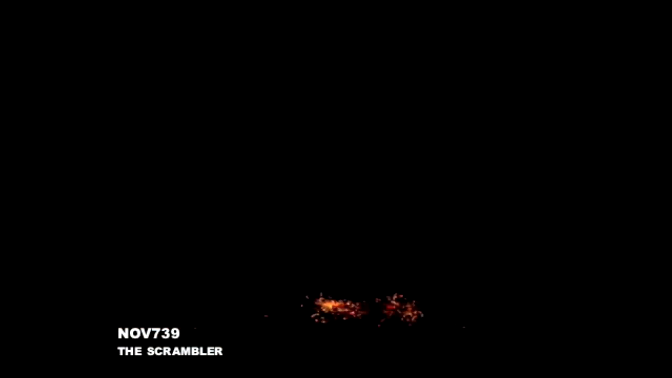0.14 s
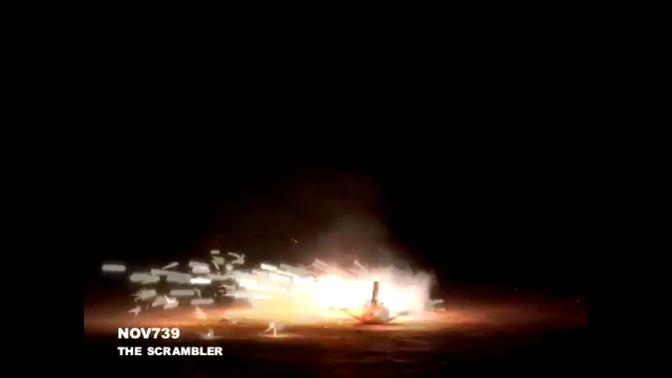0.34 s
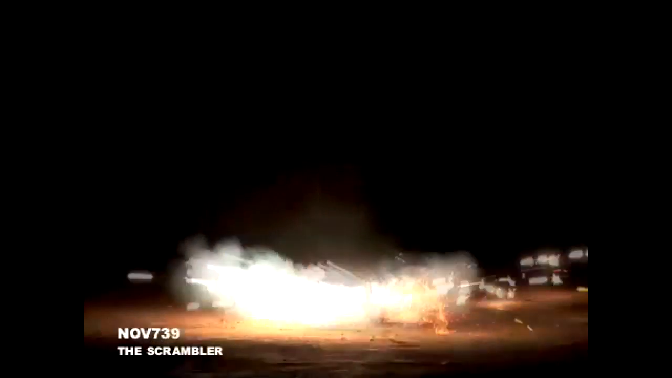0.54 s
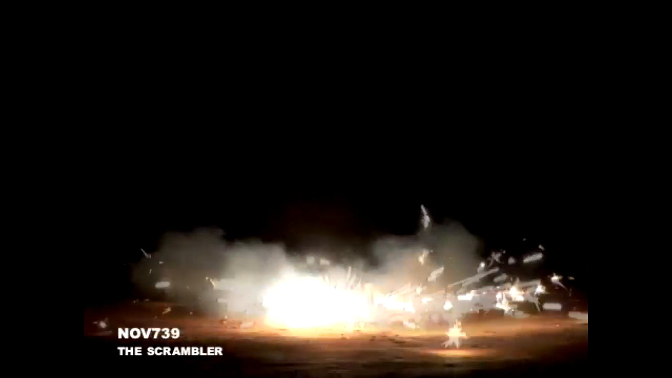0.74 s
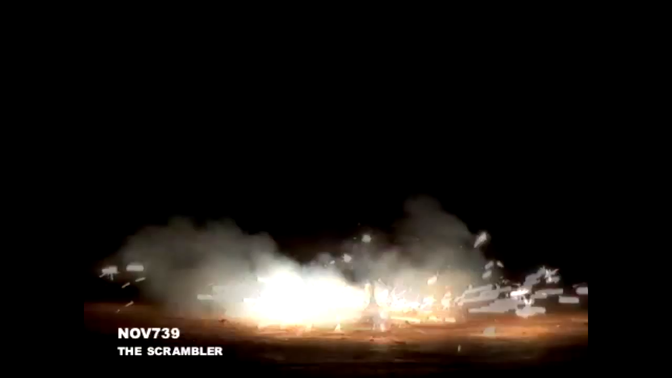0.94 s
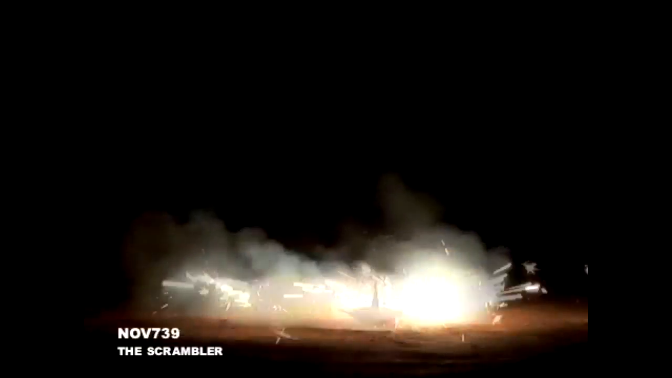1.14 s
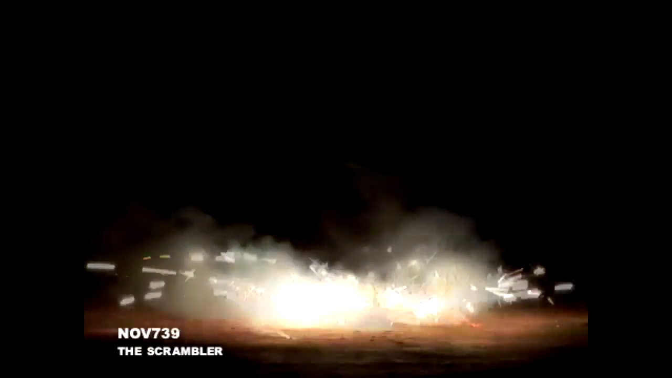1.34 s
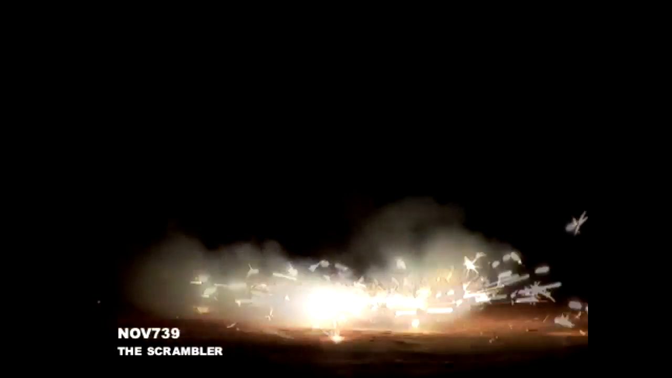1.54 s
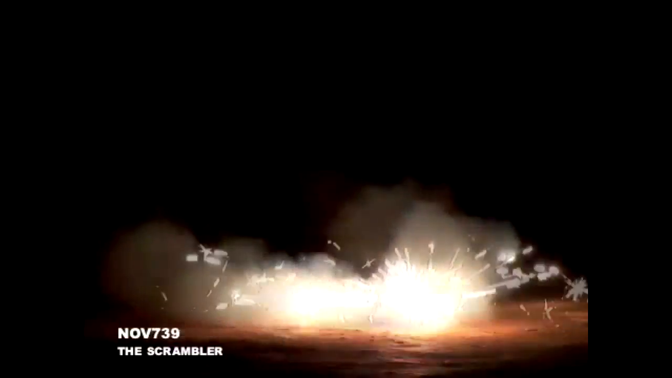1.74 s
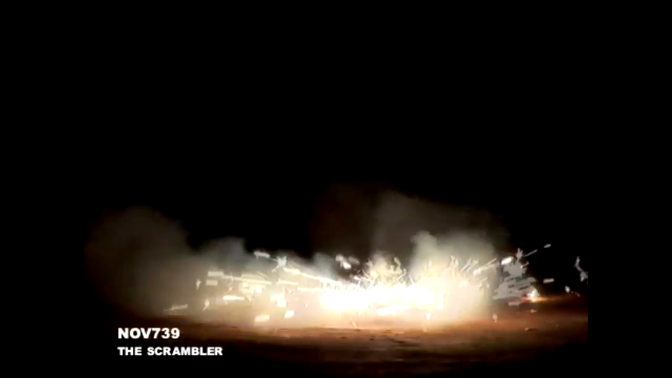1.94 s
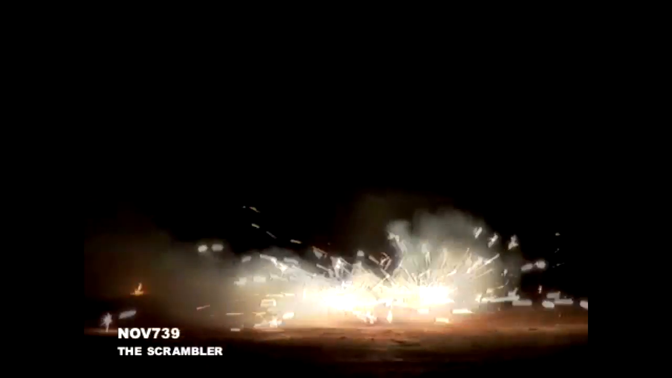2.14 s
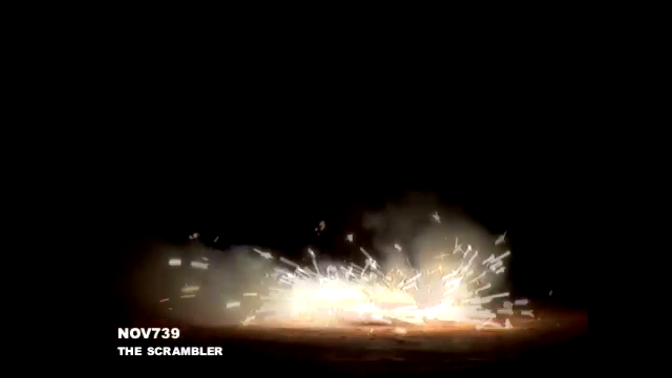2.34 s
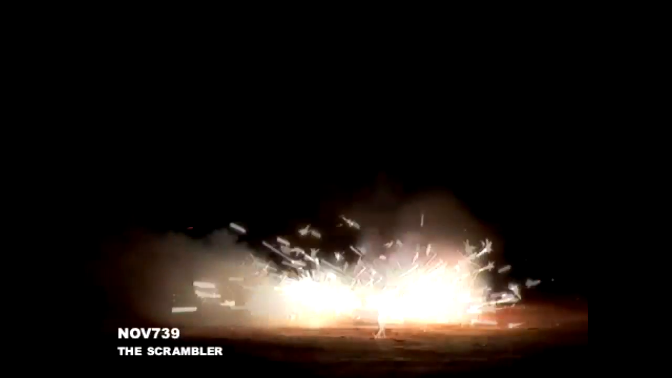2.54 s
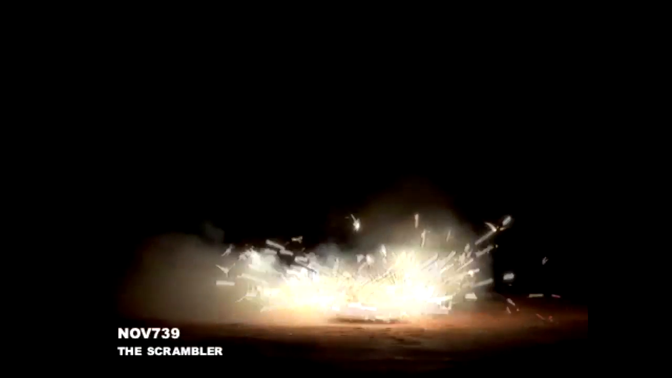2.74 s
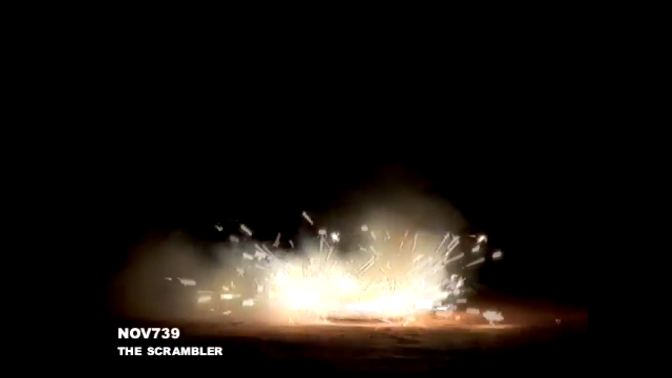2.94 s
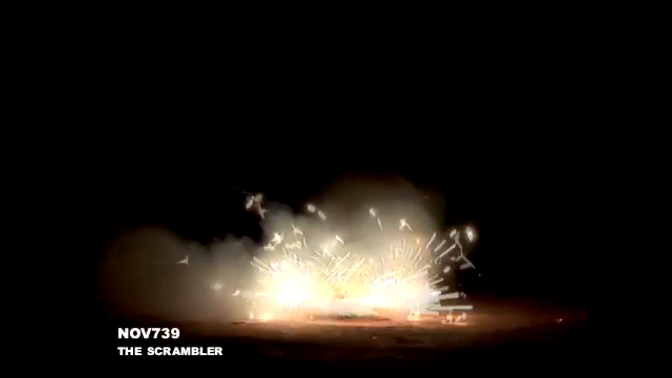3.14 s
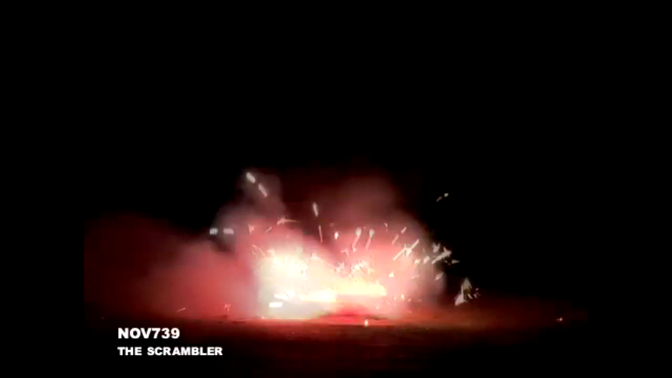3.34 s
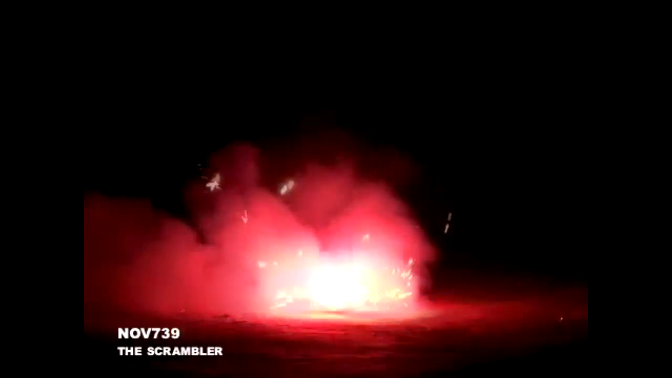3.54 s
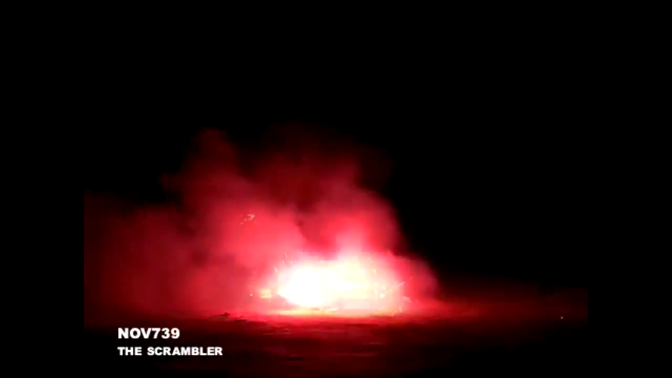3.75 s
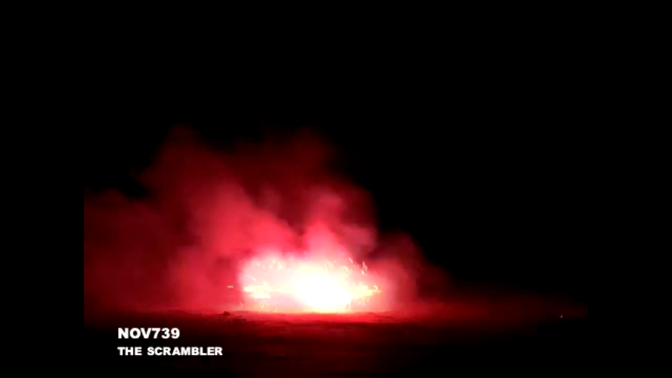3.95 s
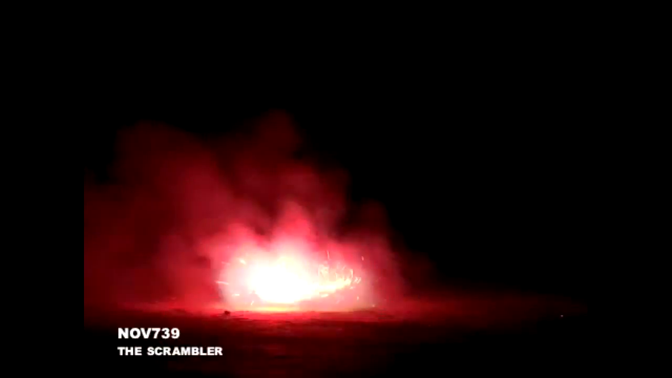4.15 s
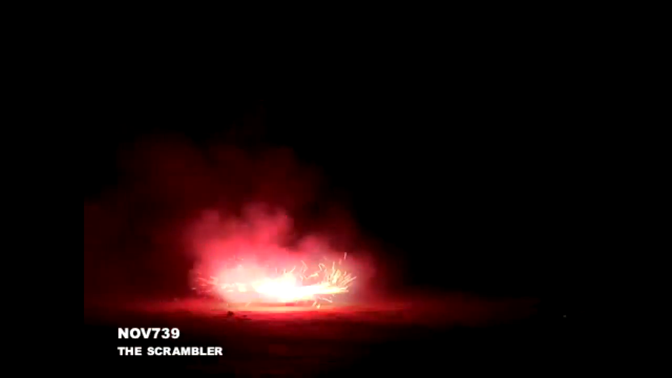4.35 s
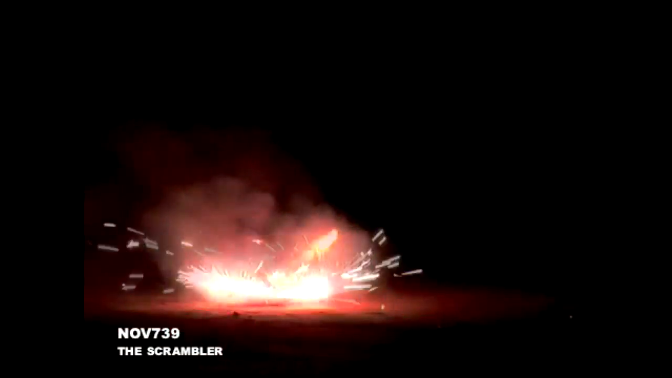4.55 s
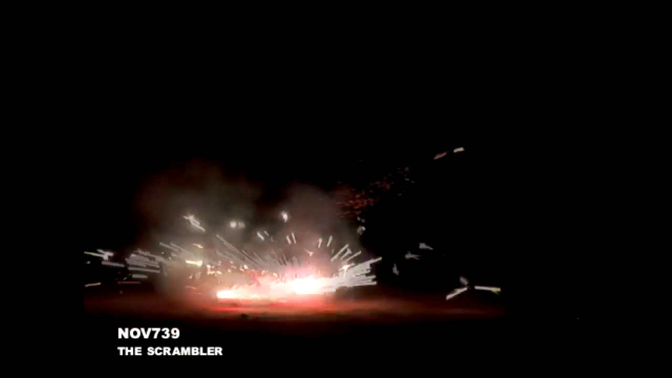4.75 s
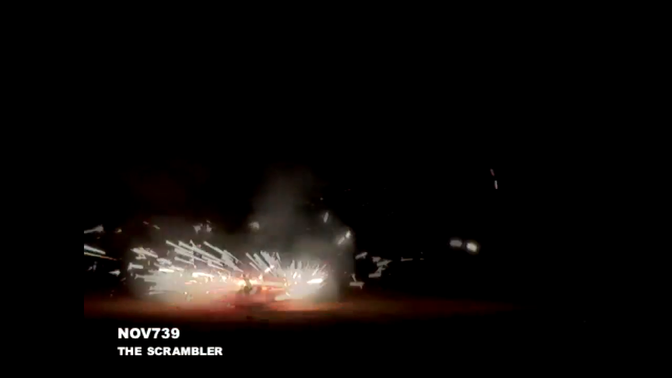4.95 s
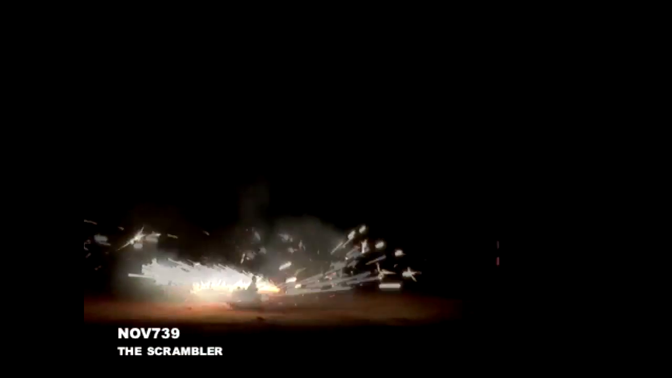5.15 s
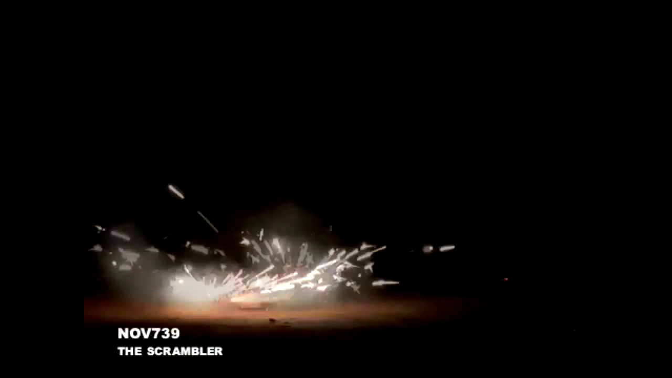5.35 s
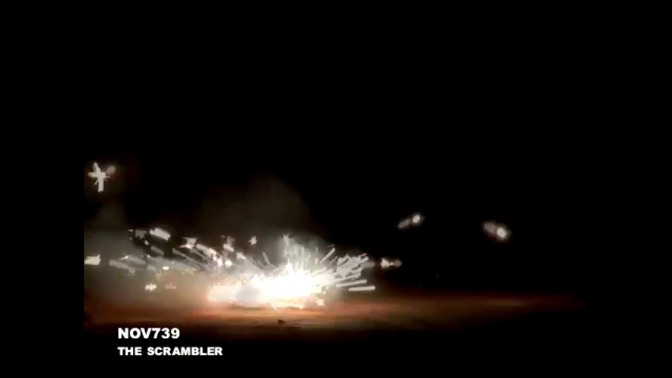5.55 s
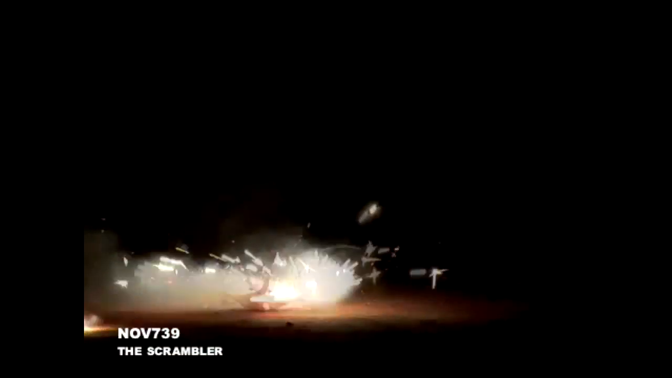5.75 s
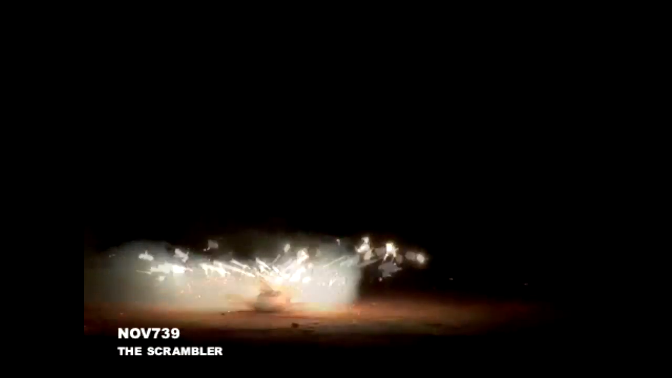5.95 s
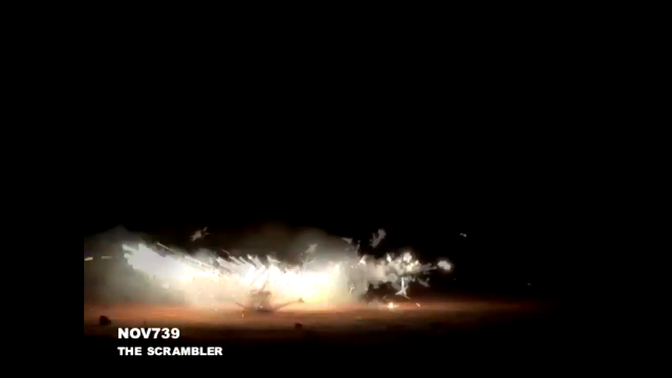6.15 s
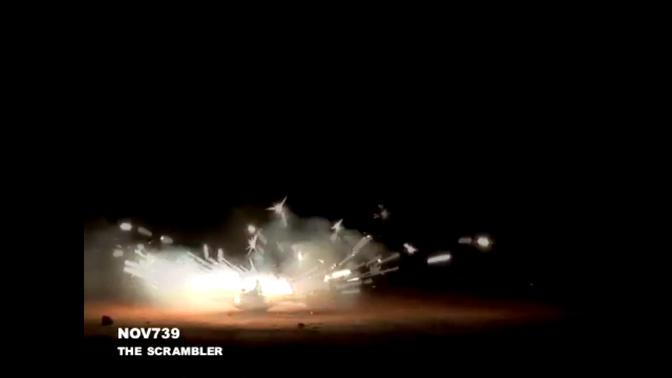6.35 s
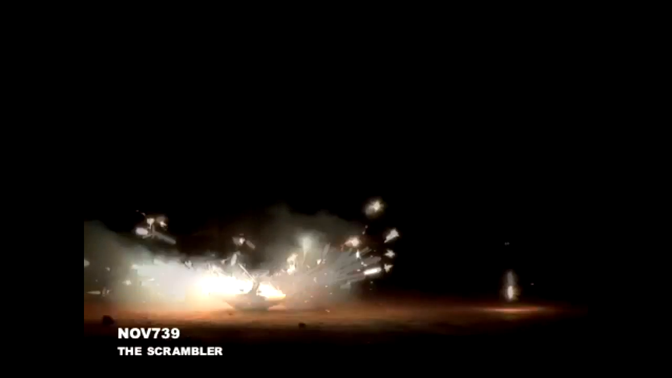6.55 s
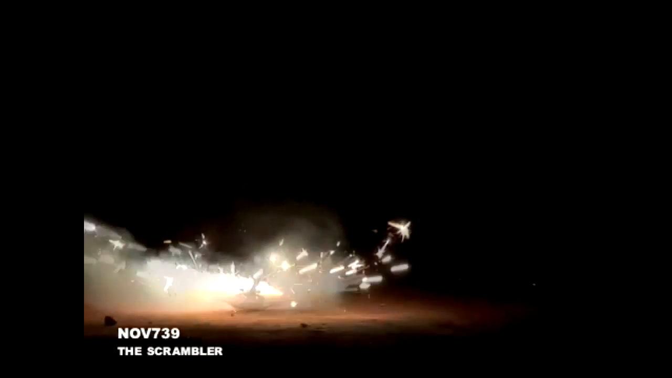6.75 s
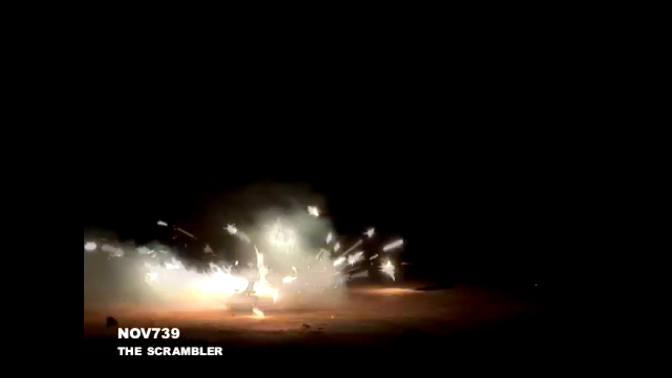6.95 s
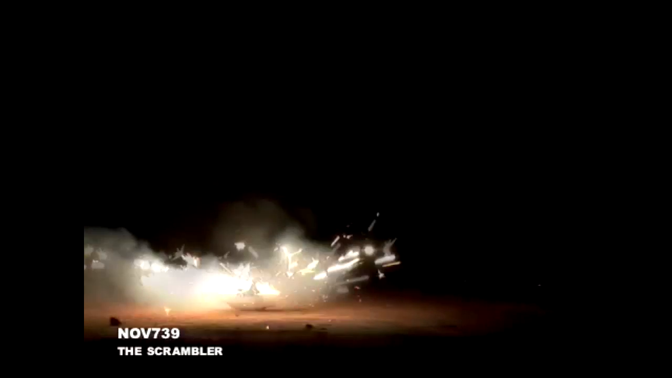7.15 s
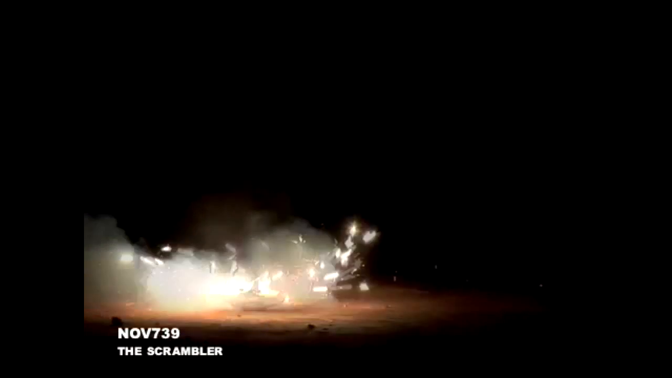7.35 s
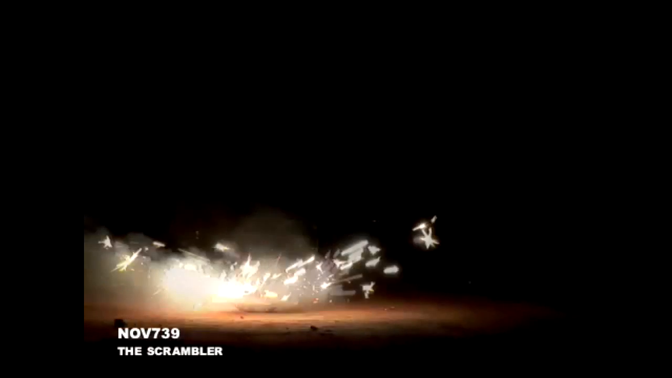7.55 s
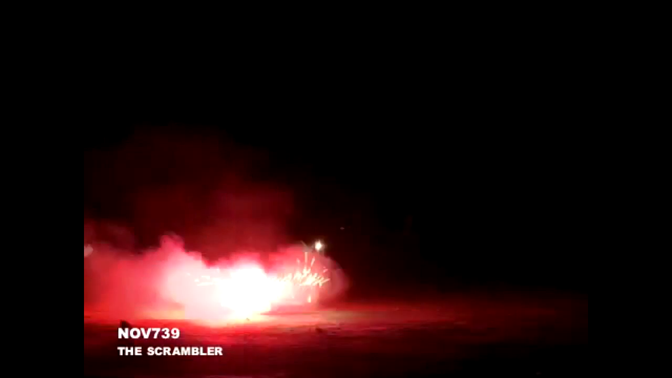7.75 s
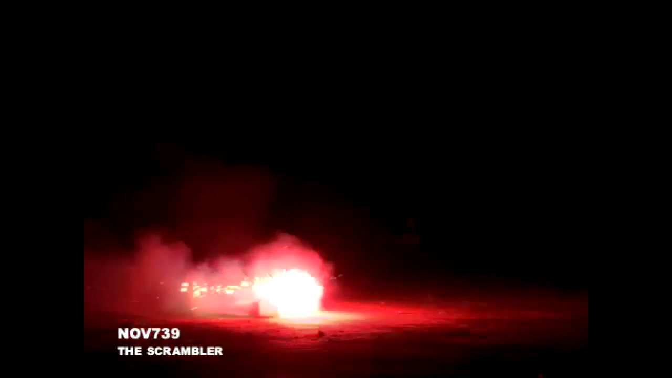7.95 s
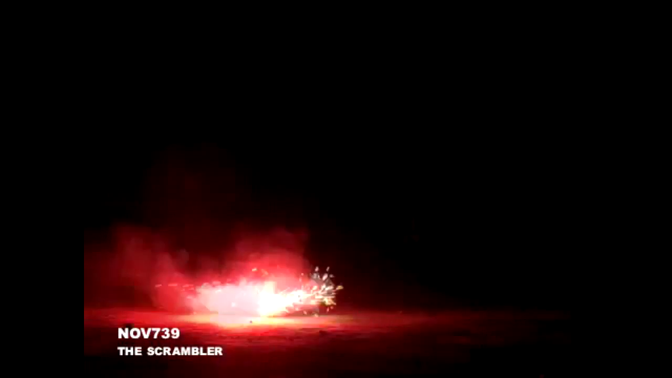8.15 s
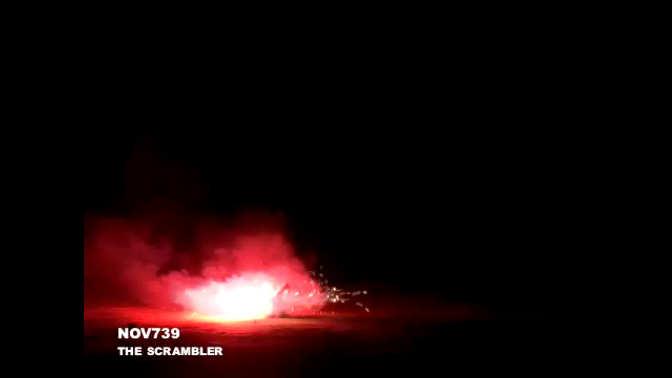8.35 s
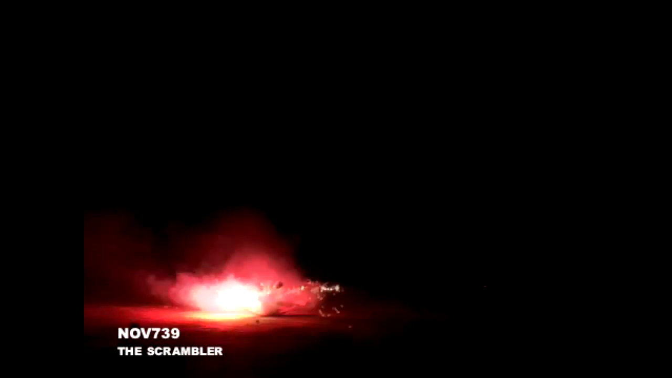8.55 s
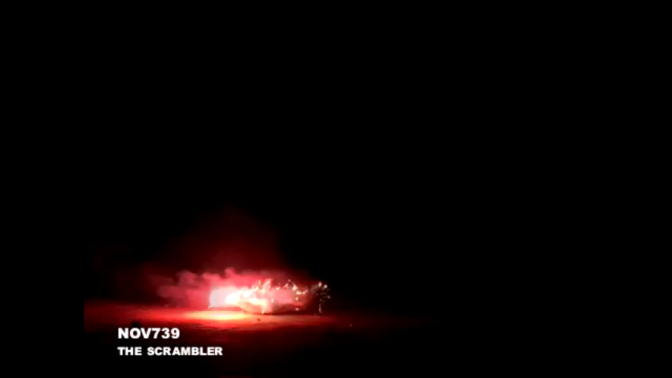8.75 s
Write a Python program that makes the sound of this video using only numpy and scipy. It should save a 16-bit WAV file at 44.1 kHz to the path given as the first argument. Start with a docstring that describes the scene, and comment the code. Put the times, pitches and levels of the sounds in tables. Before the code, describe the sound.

Outdoors at night, a ground firework catches with a spit of gas. Two very loud, buzzy, harsh whistles overlap, beating and fluttering faster as the wheel spins up, falling in pitch until they stop. Soft flame noise and tiny snaps fill a gap of about a second. One more whistle descends alone, stops suddenly, and leaves weak fizzing over low air rumble. The close microphone slightly overloads at the loudest part.

```python
"""Spinning ground firework at night

A fuse hisses, then two whistle pipes light in quick succession and slide down as they burn hollow.
The wheel swings them round, so loudness and Doppler-shifted pitch warble. A red flare of sputtering noise
follows, a third pipe whistles alone, and the flare returns. Puffs of gas mark charges that catch or spit.
The ground and the far surroundings echo faintly over a low rumble of night air."""
import sys
import numpy as np
from scipy import signal
from scipy.fft import rfft, irfft, next_fast_len
from scipy.io import wavfile
from scipy.ndimage import uniform_filter1d, minimum_filter1d

SR = 44100
rng = np.random.default_rng(int(sys.argv[2]) if len(sys.argv) > 2 else 0)


def dump(signal):
    """Clip the signal to [-1, 1] and save it as 16-bit WAV at the path in sys.argv[1]."""
    limited = np.clip(np.atleast_2d(signal).T, -1, 1)
    pcm = np.round(limited * 32767).astype(np.int16)
    wavfile.write(sys.argv[1], SR, pcm)


N = 392490
TIME = np.arange(N) / SR
# hiccups and slower surges in the burning:
# (at_s, pitch change as a share, half_length_s, level_change_db)
HICCUPS = [(0.362, .002, .012, -7.5), (0.763, -.04, 0.0035, -2), (0.903, -.045, .003, -3.5),
           (1.048, .015, .12, -0.5), (4.675, .02, .012, -1), (5.071, -.07, .0044, -1.5),
           (5.168, .02, .13, -0.5), (5.528, 0.026, .008, 0), (5.784, .03, 0.014, 2.5),
           (5.969, -.024, .13, -1.5), (6.082, .12, .016, -19.5), (7.017, .026, .16, 1)]
RELEASE_S = 0.024  # end fade of a pipe and its gas


def amp(db):
    """Turns decibels into a gain."""
    return np.exp(np.asarray(db) * (np.log(10) / 20))


def unit(x):
    """Scales to rms 1."""
    return x / np.sqrt(np.mean(abs(x) ** 2) + 1e-20)


def read(points, hz):
    """Reads a spectrum, joined by lines on a log-frequency axis."""
    f, value = np.transpose(points)
    return np.interp(np.log(hz + 1), np.log(f + 1), value)


def level(rows):
    """A level curve as a gain for every sample."""
    return amp(np.interp(TIME, *np.transpose(rows)))


def shaped(x, spectrum):
    """Colours a signal by a spectrum."""
    size = x.shape[-1]
    padded = next_fast_len(size, True)
    gain = amp(read(spectrum, np.fft.rfftfreq(padded, 1 / SR)))
    return irfft(rfft(x, padded) * gain, padded)[..., :size]


def wander(size, hz):
    """Smooth random drift of about rms 1, moving at rates up to about hz."""
    step = 8  # drawn coarsely, then joined by lines
    lowpass = signal.butter(2, hz, fs=SR / step, output="sos")
    coarse = signal.sosfilt(lowpass, rng.standard_normal(size // step + 2))
    return np.interp(np.arange(size) / step, np.arange(len(coarse)), unit(coarse))


def add(mix, s, sound):
    """Mixes a sound in from s seconds on, cut at the end of the mix."""
    part = mix[max(round(s * SR), 0):][:len(sound)]
    part += sound[:len(part)]


def bump(t, at, half):
    """A smooth hump of height 1."""
    return np.exp(-np.minimum(((t - at) / half) ** 2, 20))


def gate(t, attack, release):
    """Straight attack, hold and release over the times t."""
    return np.clip((t - t[0]) / attack, 0, 1) * np.clip((t[-1] - t) / release, 0, 1)


def air(likeness=.55):
    """Low outdoor rumble: coloured noise, partly shared by the two sides."""
    # colour of the night air: (pitch_hz, level_db per Hz)
    air_spectrum = [(20, -9.5), (60, 3), (110, 0.5), (190, 2.5), (300, -7.5), (500, -13), (1000, -21),
                    (3000, -22.5), (15000, -29)]
    # loudness of the rumble: (at_s, level_db)
    air_level = [(0, -57.5), (3.5, -60.5), (7.5, -62.5), (8.4, -60.5), (8.6, -58), (8.9, -61.5)]
    noise = rng.standard_normal((3, N))
    share = np.clip(likeness, 0, 1)
    sides = np.sqrt(share) * noise[0] + np.sqrt(1 - share) * noise[1:]
    return unit(shaped(sides, air_spectrum)) * level(air_level)


def flare(sputter_db=3.5, sparks_per_s=35, spark_db=16, crackle_s=0.0017, fade_s=0.035):
    """Flames hiss as unsteady noise with tiny random sparks; sharper crackles are fast-dying noise bursts."""
    # colour of the flame: (pitch_hz, level_db per Hz)
    flare_spectrum = [(260, -41.5), (450, -16), (958, -4), (1030, 2.5), (1410, -10.5), (2430, -0.5),
                      (3270, -1.5), (3630, 0.5), (4270, -5.5), (4670, -10), (7840, -22), (13200, -14.5),
                      (15500, -17)]
    # soft flames, the fuse and then the red flare twice:
    # (start_s, end_s, first_level_db, last_level_db, change of the sizzle above about 6 kHz in dB)
    flares = [(0, .3, -74, -68.5, 1), (3.294, 4.548, -56, -56, 0), (7.55, 8.95, -57.5, -64, -19)]
    # crackles: (at_s, level_db, treble_db)
    crackles = [(3.694, -38, 5), (3.773, -38.5, 3), (3.837, -44, 5), (3.965, -43, 13), (4.04, -39, 10.5),
                (4.13, -42.5, -3), (4.174, -40, -15), (4.207, -32.5, 11.5), (4.26, -40.5, 3.5),
                (4.377, -37, -16), (8.02, -41, -3), (8.573, -46.5, -10)]
    sparks = (rng.random(N) < sparks_per_s / SR) * rng.standard_normal(N) * amp(spark_db)
    sputter = unit(rng.standard_normal(N) * amp(sputter_db * wander(N, hz=60)))
    flame = unit(shaped(sputter + sparks, flare_spectrum))
    sizzle = shaped(flame, [(5000, -37.0), (7000, -2.5)])
    out = np.zeros(N)
    for start, end, first_db, last_db, sizzle_db in flares:
        alight = np.clip(np.minimum(TIME - start, end - TIME) / fade_s, 0, 1)
        burning = flame - sizzle + sizzle * amp(sizzle_db)
        out += burning * alight * level([(start, first_db), (end, last_db)])
    t = np.arange(SR // 20) / SR
    for s, db, treble_db in crackles:
        noise = shaped(rng.standard_normal(len(t)), flare_spectrum)
        burst = shaped(noise, [(2500, 0), (9000, treble_db)])
        add(out, s, amp(db) * unit(burst) * np.exp(-t / crackle_s))
    return out


def puffs():
    """Short rounded bursts of gas: noise gathered round one frequency."""
    # gas as a charge catches or spits: (start_s, level_db, length_s, centre_hz, width in octaves)
    puff_table = [(0.199, -51.5, 0.068, 3010, 1.2), (0.237, -21, 0.036, 2170, 1.37),
                  (0.408, -23, 0.038, 3700, 0.37), (0.744, -35.5, 0.027, 3650, 0.47),
                  (.875, -30, 0.031, 3800, 0.34), (4.475, -38.5, 0.014, 4030, 0.88),
                  (7.591, -37.5, .034, 125, .85), (7.611, -52, 0.056, 216.4, 0.63)]
    hz = np.geomspace(20, SR / 2, 60)
    out = np.zeros(N)
    for s, db, length, centre_hz, octaves in puff_table:
        hump_db = -20 * np.log10(1 + (np.log2(hz / centre_hz) / octaves) ** 2) * 1.5
        noise = unit(shaped(rng.standard_normal(SR // 4), np.c_[hz, hump_db]))
        gas = noise[:int(length * SR)]
        add(out, s, amp(db) * gas * signal.windows.tukey(len(gas), .6))
    return out


def wheel(t):
    """Angle (turns) and speed (turns a second) of the wheel; the angle adds up the speed."""
    # the wheel speeds up under two pipes, coasts under the flare, then gains again:
    # (at_s, turns a second)
    speed_curve = [(.25, 1.68), (1.67, 10.55), (2.35, 14.235), (3.48, 15.91), (4.45, 9), (5.1, 8.6),
                   (6.7, 9.94), (7.63, 10.1)]
    speed = np.interp(TIME, *np.transpose(speed_curve))
    return np.interp(t, TIME, np.cumsum(speed) / SR), np.interp(t, TIME, speed)


def burn(start, slide, end, first_hz, last_hz, slowing, first_db, last_db, squeak_s, squeak_flat):
    """The air column lengthens as the charge burns, so pitch falls; gives time, pitch, level, burn-out (0-1)."""
    burnout_s, burnout_rise, burnout_db = .03, 0.14, -15.5  # at the end the pitch flicks up, the tone fades
    t = np.arange(start, end, 1 / SR)
    spent = np.clip((t - slide) / (end - slide), 0, 1)
    depth = spent + slowing * spent * (1 - spent)
    burnout = np.exp((t - end) / burnout_s)
    pitch = (1 + burnout_rise * burnout) / ((1 - depth) / first_hz + depth / last_hz)
    # a pipe first squeaks flat, then quickly slides up to its note
    pitch = pitch * (1 - squeak_flat * np.clip(2 - 2 * (t - start) / squeak_s, 0, 1))
    choke_db = sum(change * bump(t, at, half) for at, _, half, change in HICCUPS)
    db = first_db + (last_db - first_db) * depth + burnout_db * burnout + choke_db
    return t, pitch, db, burnout


def pipe(t, pitch, db, burnout, swell_s, seat, radius, bright_db, shimmer_db=2.0, jitter=.003, drift=.0025,
         beam_db=1.5, facing=0.32, shadow_db=4.0, hidden=0.801, fuzz_hz=145, flutter_db=1.5, rasp=0.0035):
    """One whistle as a stack of overtones, shifted and beamed as it rides the wheel."""
    # overtones: (multiple of the pitch, full_tube_db, hollow_tube_db, fuzz 0-1)
    partials = [(.5, -15.5, -33.5, 1), (1, -8.5, -22, 0.06), (1.5, -12, -88.5, 0.99), (2, 0.5, -1, .05),
                (3, -6.5, -30, 0.72), (4, -14.5, -16, 0.4), (5, -8, -29.5, 0.4), (6, -7, -12.5, 0.8),
                (7, -6.5, -29, .8), (8, -6.5, -13, .5)]
    # how strongly each frequency of the whistles carries: (pitch_hz, level_db)
    colour = [(900, -38.5), (1800, -13.5), (2600, 0), (3500, 1), (4200, 1.5), (4700, -8.5), (5200, 0.5),
              (6200, -12), (7000, -11), (7900, -16), (9000, -11), (10500, -10), (13200, -12), (15500, -21)]
    # spells in which the odd overtones drop out or come forward: (at_s, half_length_s, change_db)
    odd_spells = [(2.45, 0.13, -17), (2.75, 0.27, 6), (6.101, 0.045, -21), (6.374, 0.026, -16.5),
                  (6.52, 0.046, -5), (7.049, 0.31, 7.5)]
    # pitches between which the overtone balance shifts from full-tube to hollow-tube levels
    full_hz, hollow_hz = 3800, 1944
    burnout_odd_db = -50.5
    attack_s, swell_db = .005, -11  # a pipe speaks softly, then swells to its level
    sound_speed = 343  # metres a second

    turns, speed = wheel(t)
    angle = 2 * np.pi * (turns + seat)
    hollow = np.clip((1 / pitch - 1 / full_hz) / (1 / hollow_hz - 1 / full_hz), 0, 1)
    odd_db = burnout_odd_db * burnout + sum(change * bump(t, at, half) for at, half, change in odd_spells)
    # Doppler shift: sharp on the way towards the listener, flat on the way back
    hz = pitch / (1 - 2 * np.pi * radius * speed / sound_speed * np.cos(angle))
    # uneven burning shakes the pitch
    jerks = sum(jump * bump(t, at, half) for at, jump, half, _ in HICCUPS)
    hz = hz * (1 + jerks + jitter * wander(len(t), hz=209.0) + drift * wander(len(t), hz=35.83))
    # turbulence jolts each cycle, so a skirt of noise clings to the high overtones
    jolts = rasp * (0.11 + hollow) * wander(len(t), hz=503)
    phase = 2 * np.pi * np.cumsum(hz) / SR + jolts
    # once a turn the mouth faces the listener, and once it passes behind the body
    facing_db = beam_db * np.cos(angle - 2 * np.pi * facing)
    hiding_db = shadow_db * np.exp(6 * (np.cos(angle - 2 * np.pi * hidden) - 1))
    swing_db = facing_db - hiding_db
    out = np.zeros(len(t))
    for multiple, full_db, hollow_db, fuzz in partials:
        k, fuzz = round(2 * multiple) / 2, np.clip(fuzz, 0, 1)
        source_db = full_db + (hollow_db - full_db) * hollow + odd_db * (k % 2 == 1)
        # the overtones brighten and dull unevenly
        source_db = source_db + np.log2(k / 2) * (bright_db + shimmer_db * wander(len(t), hz=12.5))
        # the swing of the wheel changes high overtones most
        heard_db = source_db + read(colour, k * hz) + swing_db * (k * hz / 4000) ** 0.68
        gain = amp(heard_db) * (k * hz < SR / 2)
        tone = np.cos(k * phase)
        blur = wander(len(t), fuzz_hz) * tone + wander(len(t), fuzz_hz) * np.sin(k * phase)
        out += gain * (np.sqrt(2 * (1 - fuzz ** 2)) * tone + fuzz * blur)
    rising_db = swell_db * np.exp((t[0] - t) / swell_s)
    loudness = amp(db + rising_db + flutter_db * wander(len(t), hz=83))
    return out * gate(t, attack_s, RELEASE_S) * loudness


def jet(t, db, seat, sputter_db=2.0, swing_db=2.5, facing=0.34, follow=0.98):
    """Uneven nozzle hiss of coloured noise: it surges early in the burn and swells once a turn."""
    # colour of the rushing gas: (pitch_hz, level_db per Hz)
    jet_spectrum = [(150, -22.5), (500, -19.5), (1100, -5.5), (1400, -7.5), (2000, -0.5), (3400, 7),
                    (4700, 6.5), (5500, 4.5), (7500, -37), (10000, -2), (13500, -24), (16000, 1)]
    # tint that thins the steady hiss around 5 to 7 kHz: (pitch_hz, level_db)
    steady_tint = [(4000, 1), (5000, -12.5), (7000, -10.5), (9000, -1)]
    # tint that brightens the surge: (pitch_hz, level_db)
    surge_tint = [(4000, 0), (9000, 2), (13000, 10), (16000, 2.5)]
    steady_db, rise_s = -28.5, .02  # levels are set against the pipe
    surge_db, surge_at_s, surge_half_s = -23.5, .43, 0.28
    steady, surge = shaped(rng.standard_normal((2, len(t))), jet_spectrum)
    gas = amp(steady_db) * unit(shaped(steady, steady_tint))
    surge_shape = bump(t - t[0], surge_at_s, surge_half_s)
    gas = gas + amp(surge_db) * unit(shaped(surge, surge_tint)) * surge_shape
    towards = np.cos(2 * np.pi * (wheel(t)[0] + seat - facing))
    # when the tone chokes, the gas falters slightly less
    gas_db = db.mean() + follow * (db - db.mean())
    loudness = amp(gas_db + sputter_db * wander(len(t), hz=130) + swing_db * towards)
    return gas * gate(t, rise_s, RELEASE_S) * loudness


def whistles():
    """Two pipes about a third of a turn apart, then the third alone, each with its rush of gas."""
    # whistle pipes: (lights_s, starts_to_slide_s, burns_out_s, first_pitch_hz, last_pitch_hz,
    # slowing of the slide 0-1, first_level_db, last_level_db, opening_squeak_s,
    # squeak flatness as a share of the pitch, swell_s, seat on the rim in turns,
    # distance from the hub in metres, brightness in dB an octave)
    pipes = [(0.265, .49, 3.485, 3591, 1780, .25, -10.5, -13.5, .016, 0.24, 0.014, -0.4, .14, 0.75),
             (0.407, .455, 3.335, 3424, 1710, .27, -8.5, -12.5, .046, 0.047, .012, -.72, .14, 1.15),
             (4.487, 4.552, 7.662, 3822, 1742, .42, -8.5, -10, .011, .2, 0.25, -.46, .13, 0)]
    out = np.zeros(N)
    for *charge, swell_s, seat, radius, bright_db in pipes:
        t, pitch, db, burnout = burn(*charge)
        tone = pipe(t, pitch, db, burnout, swell_s, seat, radius, bright_db)
        add(out, t[0], tone + jet(t, db, seat))
    return out


def echoes(x, count, start_s, hold_s, t60):
    """Scattered reflections that hold for a while, then die away at 60 dB in t60 seconds."""
    at = start_s + (np.arange(count) + rng.random(count)) / count * (hold_s + t60 / 2)
    taps = np.zeros(int(at[-1] * SR) + 1)
    fade_db = -60 * np.maximum(at - start_s - hold_s, 0) / t60
    taps[(at * SR).astype(int)] = rng.choice([-1, 1], count) * amp(fade_db)
    return signal.oaconvolve(x, taps / np.linalg.norm(taps))[:N]


def scene(near_db=-17, scatter_db=-24, far_db=-35):
    """The firework, reflections from the ground about it, a faint far echo and the night air."""
    fire = whistles() + flare() + puffs()
    near = echoes(fire, count=40, start_s=0.0038, hold_s=0.0057, t60=.06)
    # rough ground scatters the treble most, differently to each side
    scatter = np.array([echoes(fire, count=60, start_s=.001, hold_s=0.0024, t60=0.041) for side in range(2)])
    scatter = shaped(scatter, [(3800, -4.5), (5500, 18), (12000, 1)])
    far = np.array([echoes(fire, count=1500, start_s=0.047, hold_s=0.21, t60=0.6) for side in range(2)])
    # a little of each side's far echo leaks into the other
    far = shaped(far + 0.1 * far[::-1], [(4000, 4.0), (5500, -2.5), (7000, 6.5), (14000, -1)])
    return fire + amp(near_db) * near + amp(scatter_db) * scatter + amp(far_db) * far + air()


def record(dry, bend=0.042, ceiling=0.92):
    """Two microphone ports that differ by frequency and bend slightly when loud; a limiter; a treble cut."""
    # difference between the ports: (pitch_hz, side against mid in dB)
    spread = [(100, -16), (250, 0), (480, 2.5), (650, -5), (1100, -22), (2000, -19.5), (2800, -41),
              (3550, -31), (4520, -12.5), (5740, -7.5), (7300, -3.5), (9280, -7.5), (11800, -19),
              (15000, -7)]
    edge_hz = 15820
    size = next_fast_len(N + SR // 10, True)
    hz = np.fft.rfftfreq(size, 1 / SR)
    mid = dry.mean(0)
    # the bend makes a low swooping difference tone while two pipes sound together
    low_band = signal.butter(2, [85, 620], "bandpass", fs=SR, output="sos")
    swoop = bend * signal.sosfilt(low_band, mid ** 2)
    # a quarter-cycle shift, added to one port and taken from the other
    side = irfft(-1j * rfft(mid + swoop, size) * amp(read(spread, hz)), size)[:N]
    ports = dry + swoop + np.array([side, -side])
    headroom = np.minimum(1, ceiling / (abs(ports).max(0) + 1e-9))
    ports = ports * uniform_filter1d(minimum_filter1d(headroom, size=400), size=400)
    lowpass = signal.firwin(801, edge_hz, window=("kaiser", 9), fs=SR)
    return signal.oaconvolve(ports, lowpass[None], "same")


dry = scene()
out = record(dry)
dump(out)
```